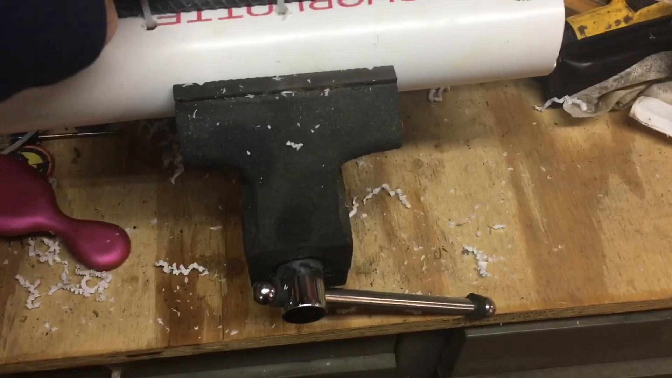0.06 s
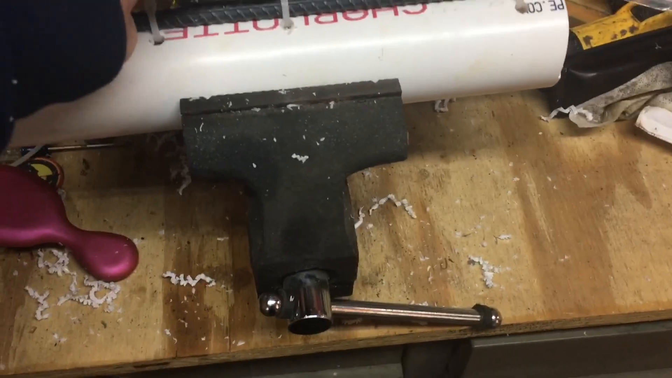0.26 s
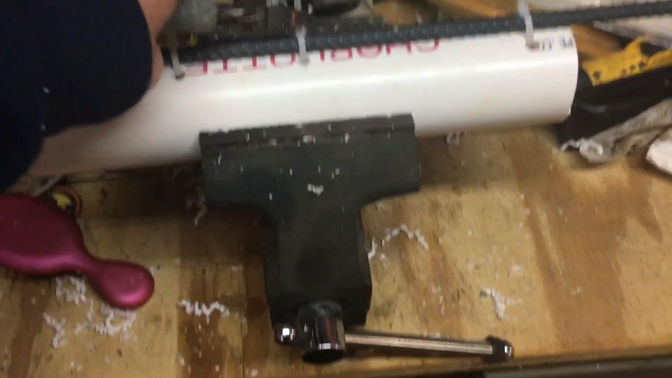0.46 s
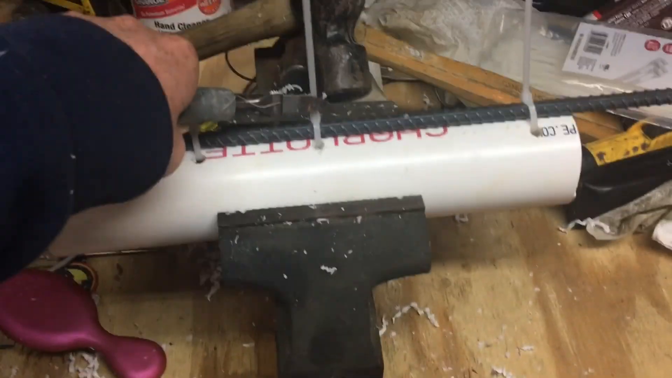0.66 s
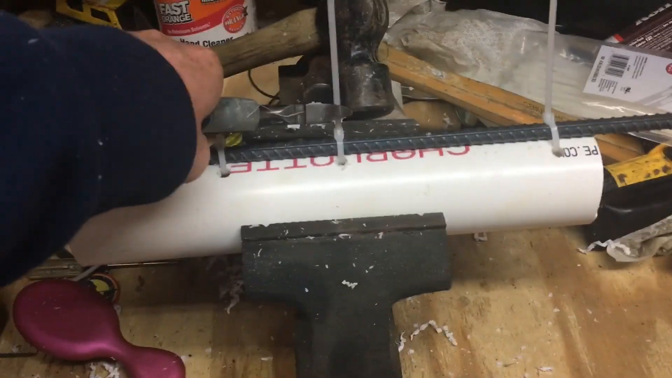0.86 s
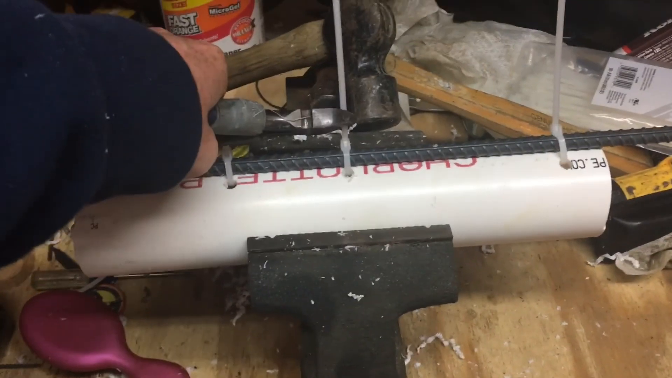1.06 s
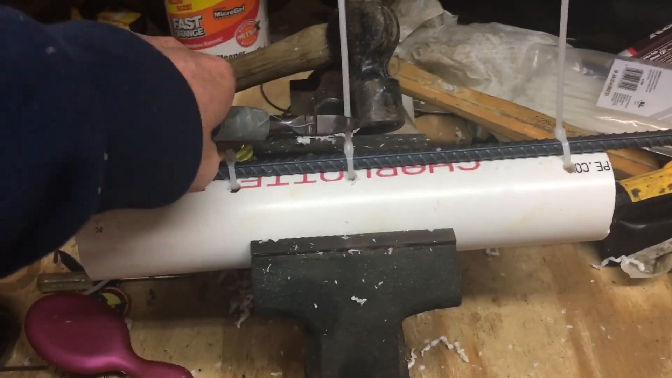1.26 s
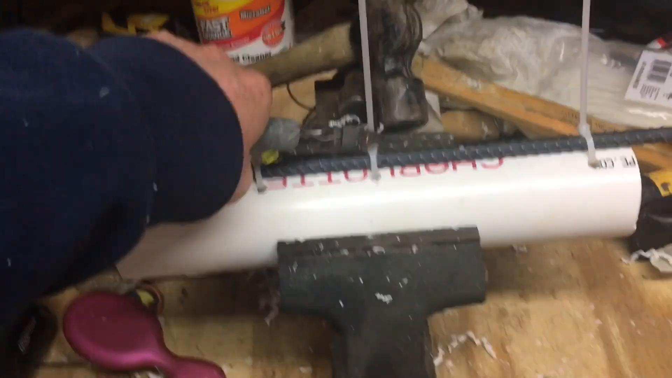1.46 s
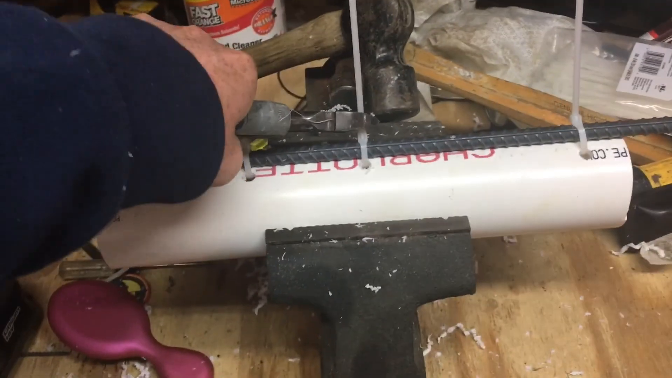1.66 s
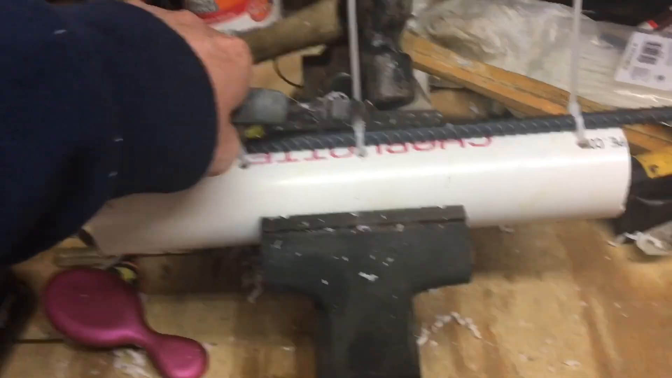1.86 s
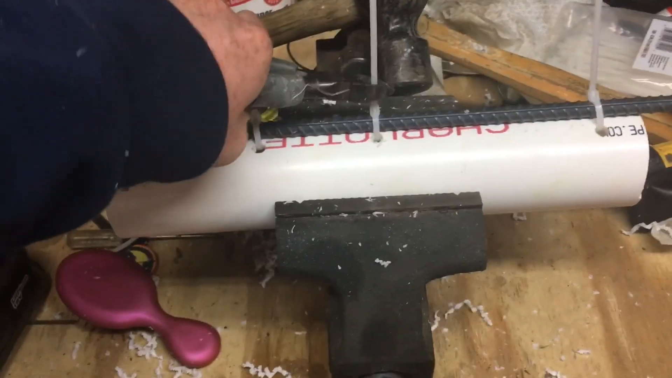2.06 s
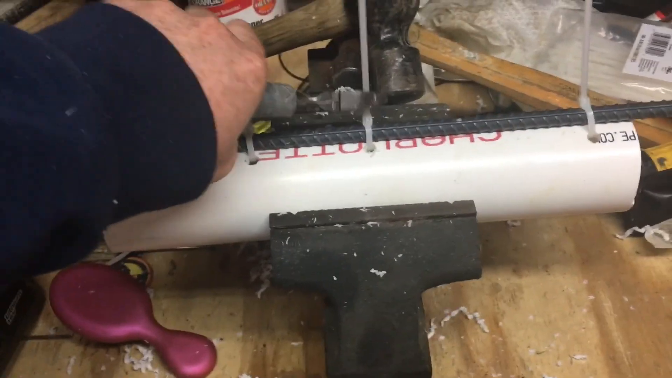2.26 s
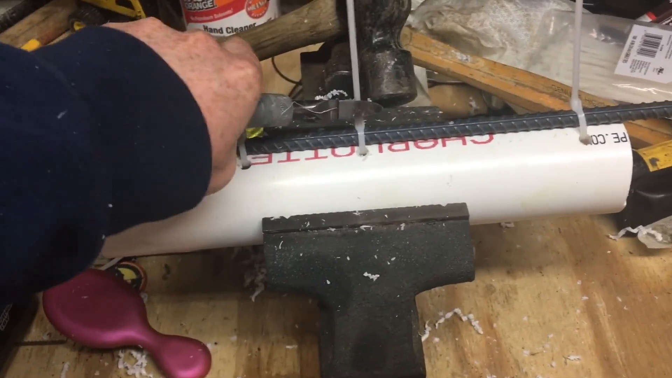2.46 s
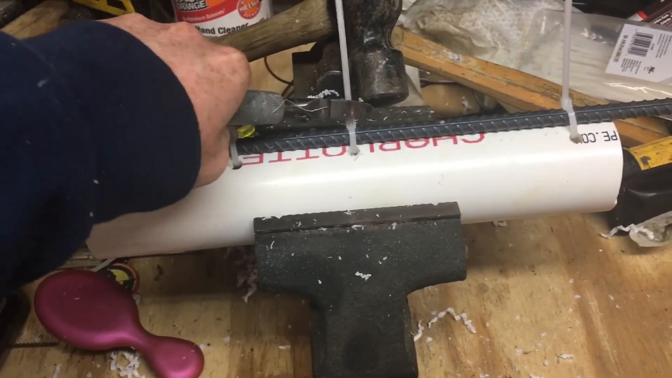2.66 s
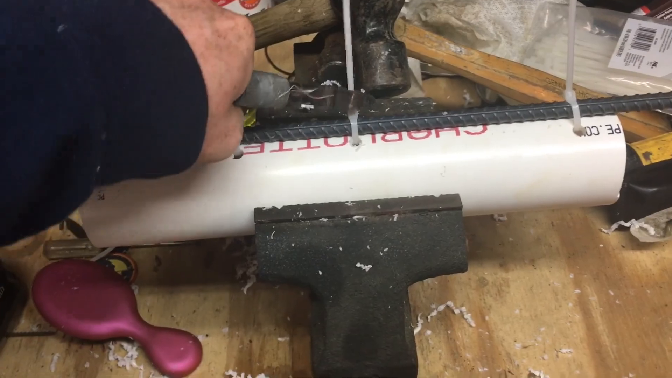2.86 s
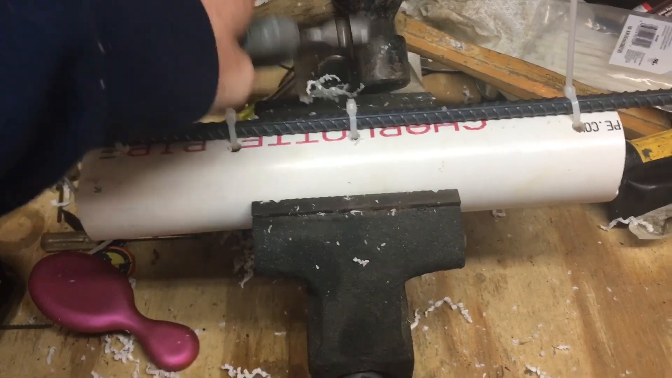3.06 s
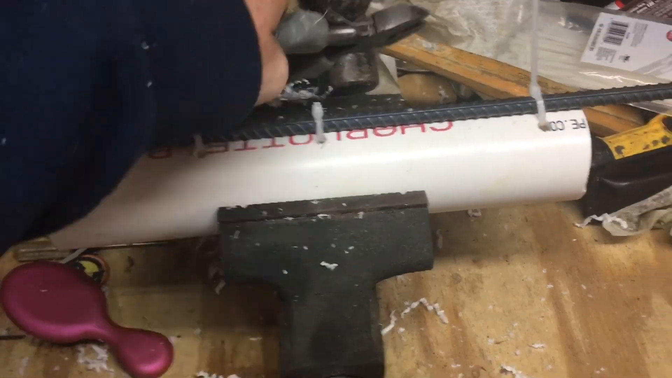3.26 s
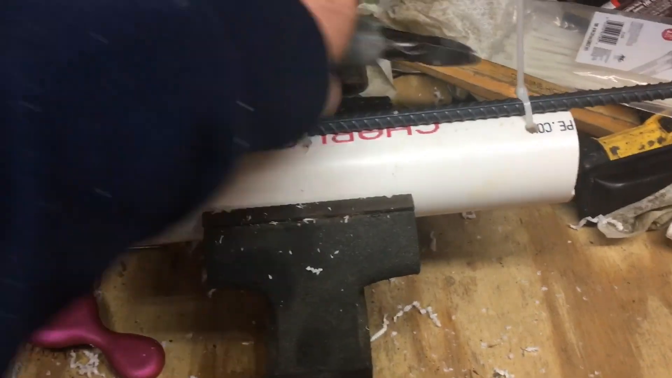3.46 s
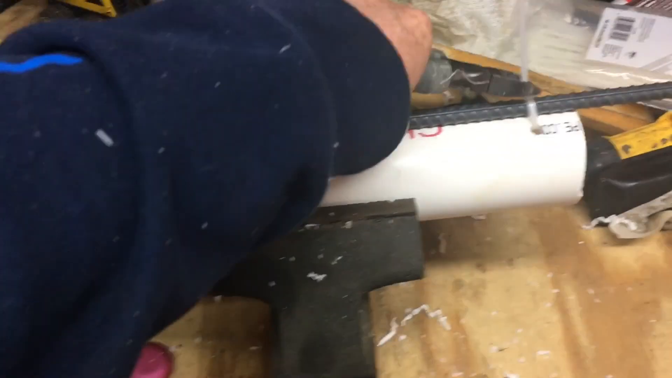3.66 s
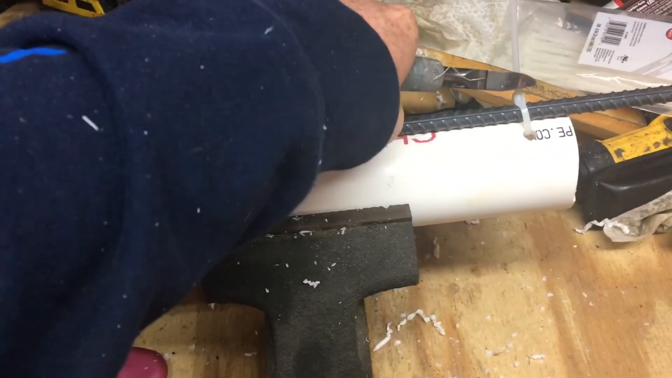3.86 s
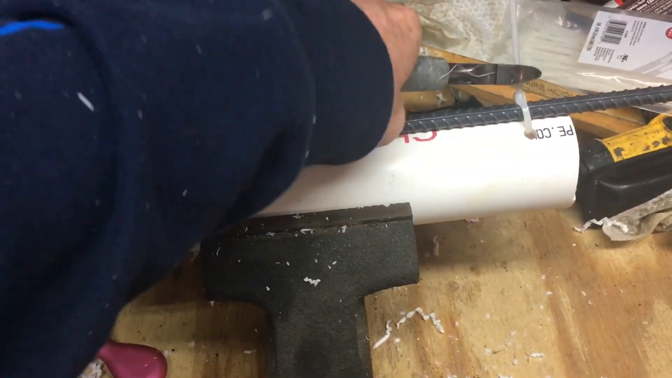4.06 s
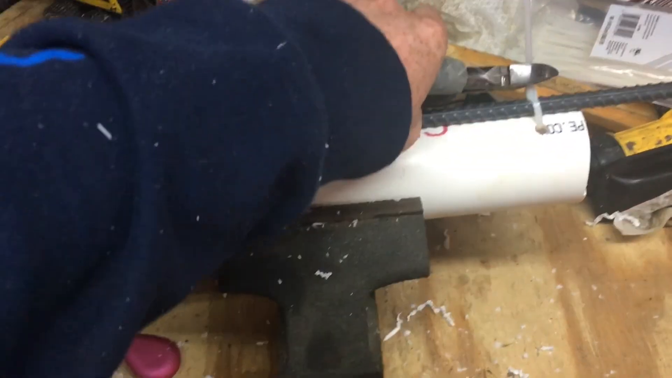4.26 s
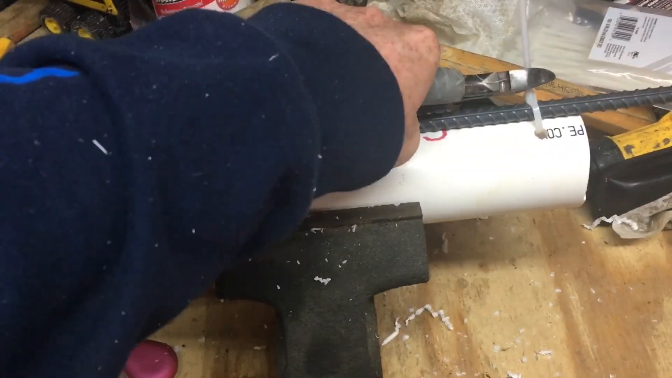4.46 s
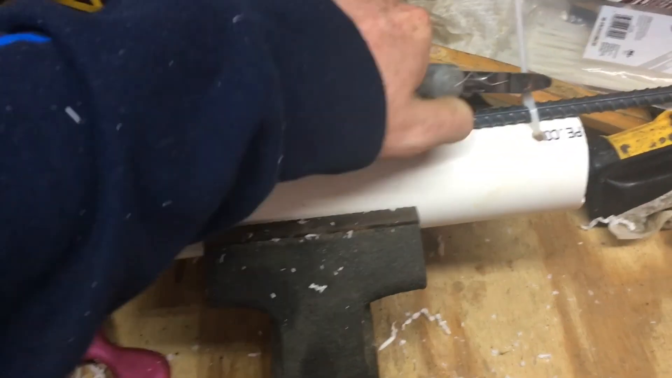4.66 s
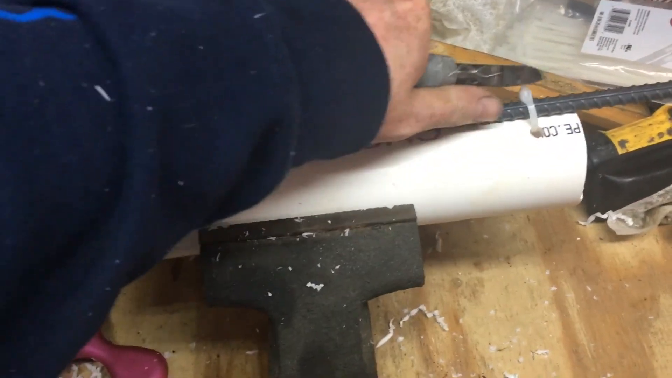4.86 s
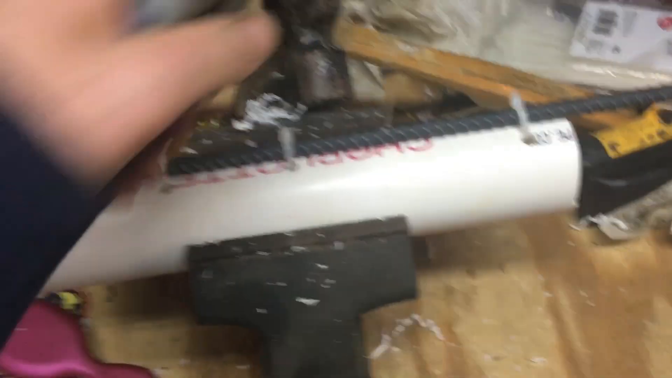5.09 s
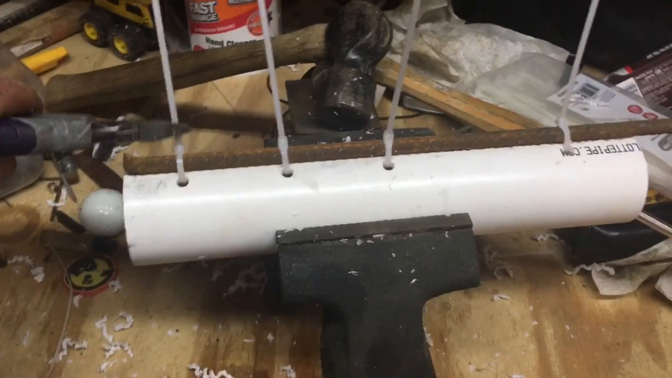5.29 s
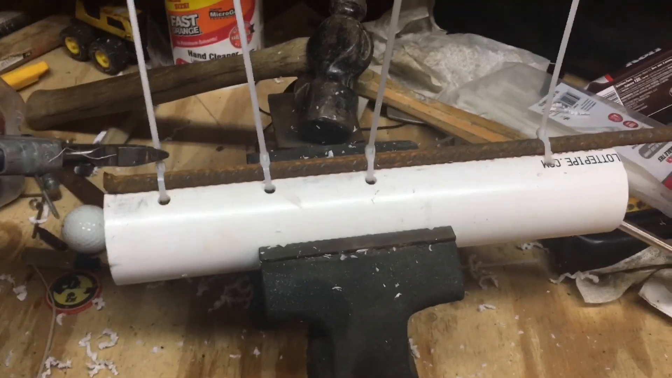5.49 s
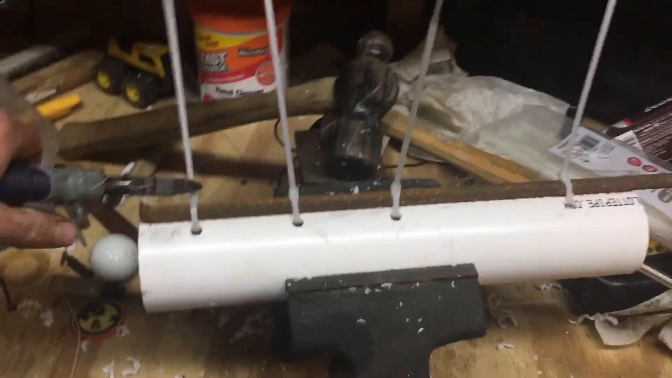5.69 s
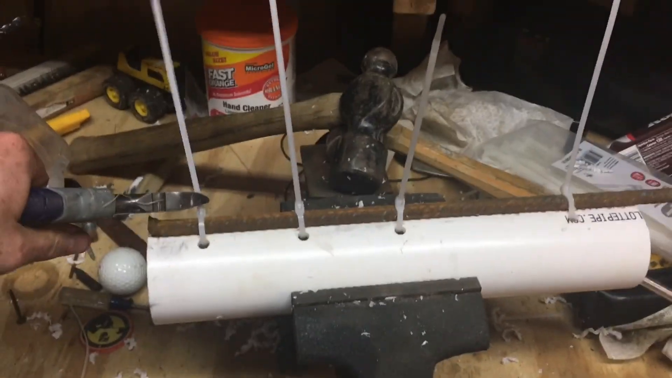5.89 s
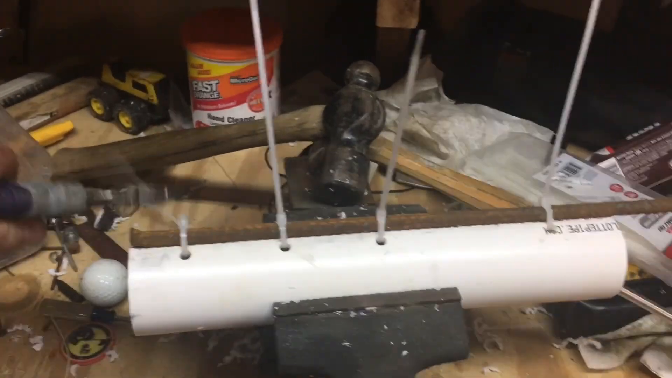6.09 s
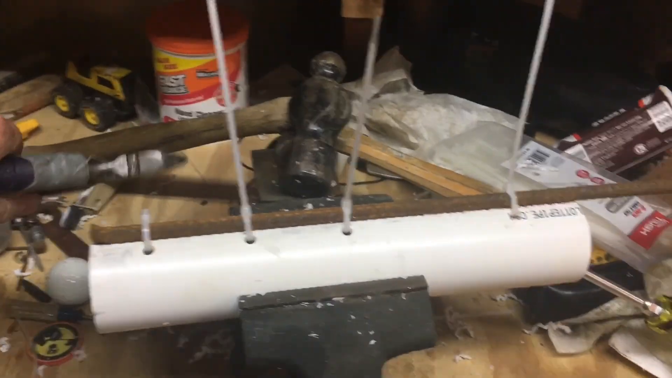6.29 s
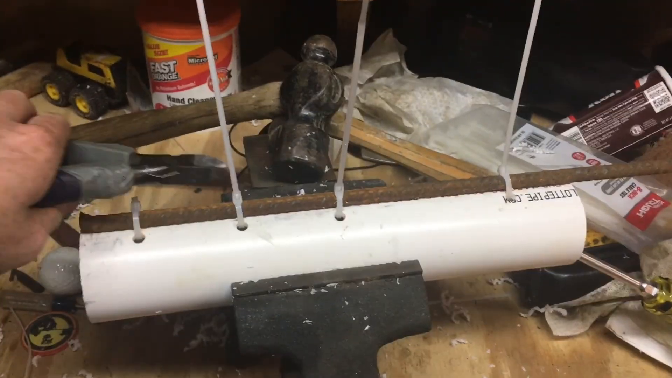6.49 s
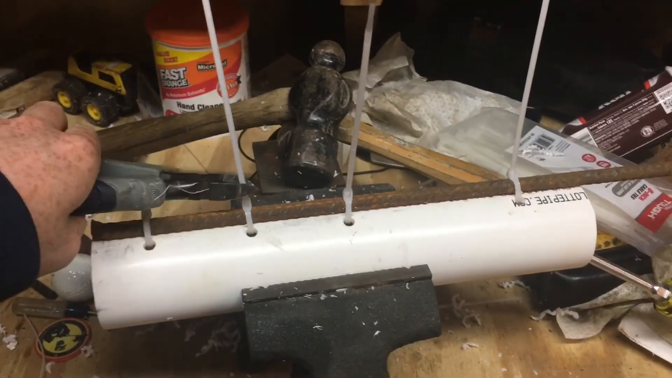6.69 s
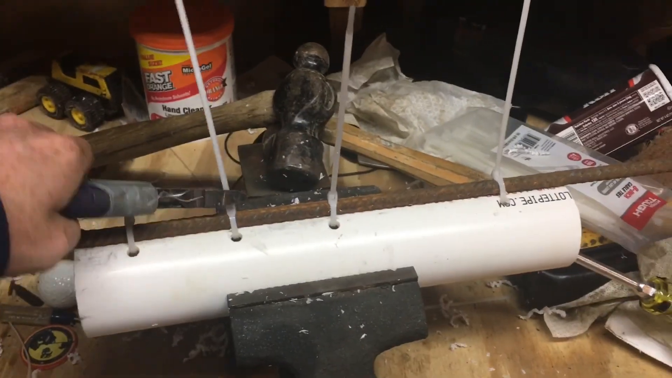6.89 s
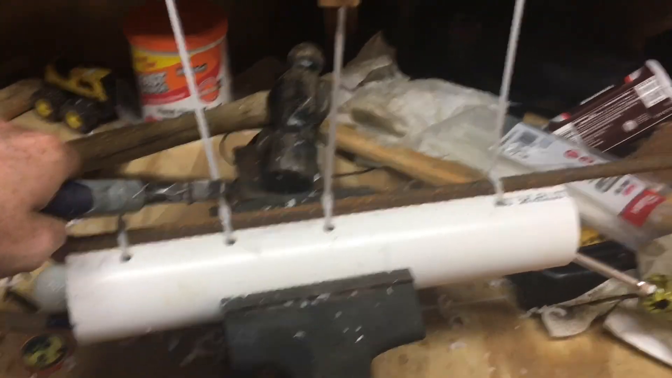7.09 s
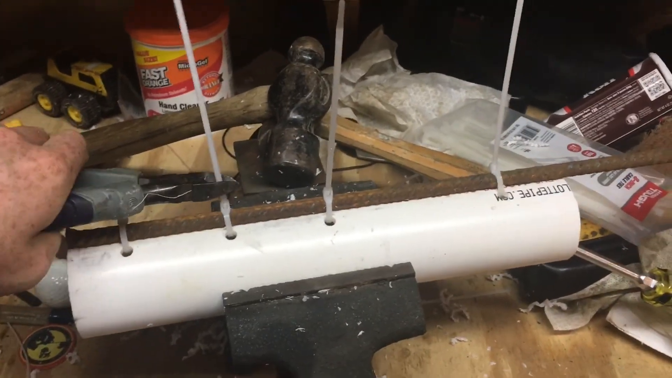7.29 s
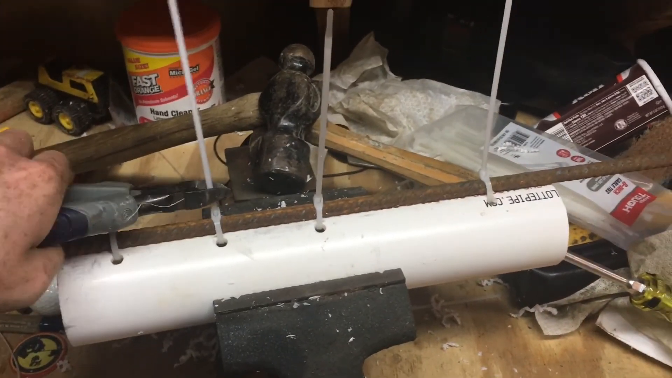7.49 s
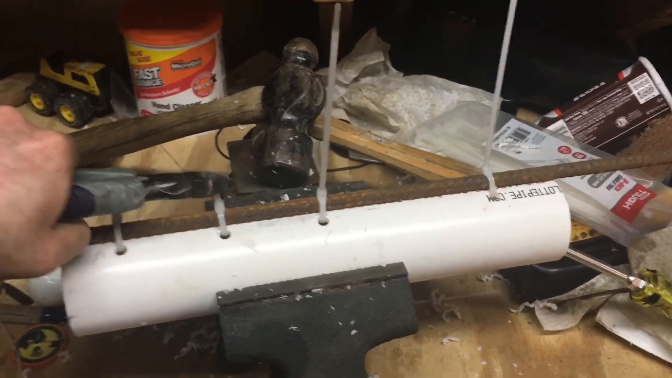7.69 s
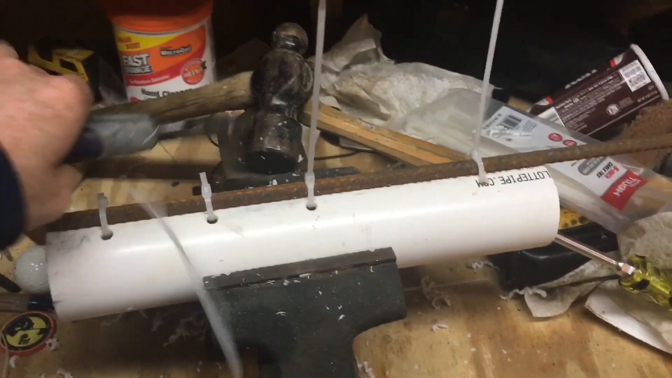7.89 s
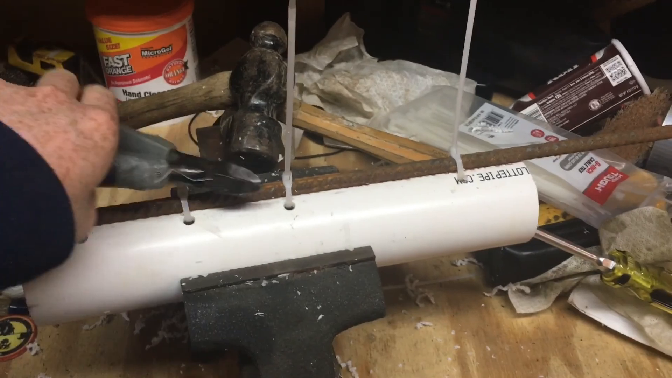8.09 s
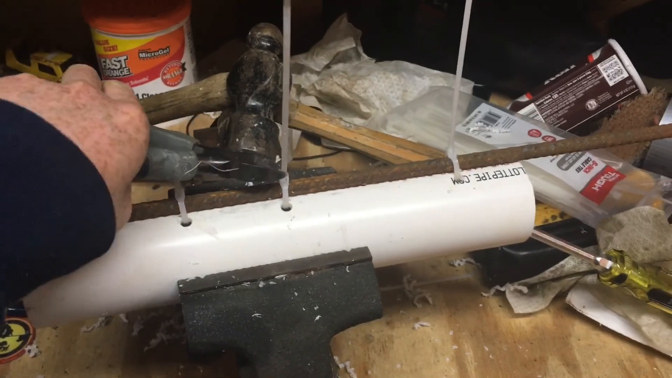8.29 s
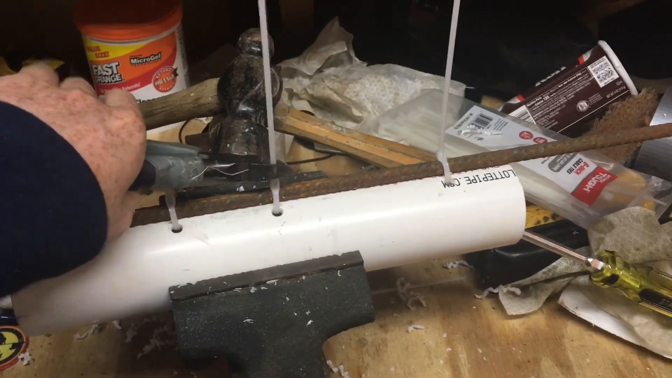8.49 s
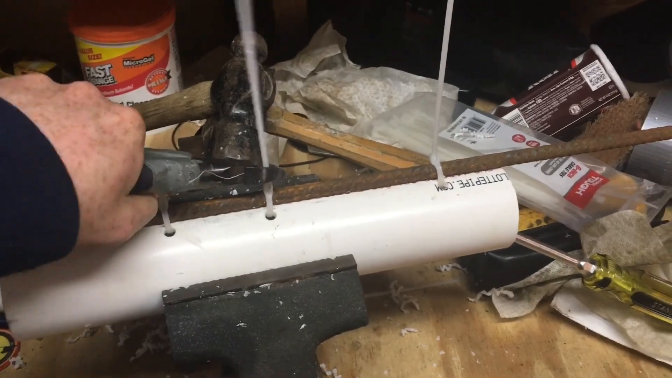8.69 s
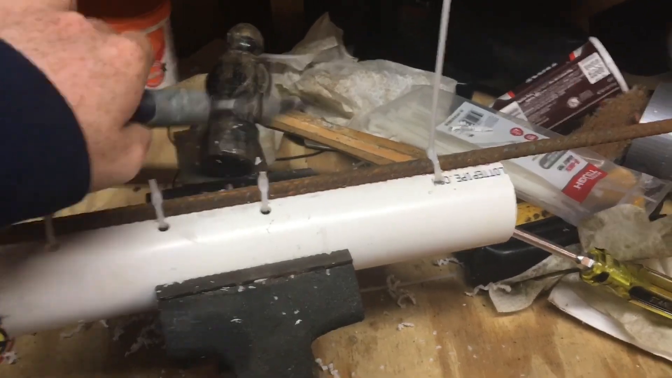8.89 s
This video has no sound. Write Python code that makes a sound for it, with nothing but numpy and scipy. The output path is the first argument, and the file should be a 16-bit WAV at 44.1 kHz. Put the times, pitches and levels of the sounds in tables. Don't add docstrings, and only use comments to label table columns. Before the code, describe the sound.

Sparse, bright plier snips crack over a steady low workshop hum, with steel ticks, dull bench knocks and cut plastic tails skittering between them.

```python
import sys
import numpy as np
from scipy import signal
from scipy.fft import rfft, irfft, next_fast_len
from scipy.io import wavfile
from scipy.ndimage import uniform_filter1d

SR = 44100
rng = np.random.default_rng(int(sys.argv[2]) if len(sys.argv) > 2 else 0)


def transcribe(u):
    v = np.clip(np.atleast_2d(u).T, -1, 1)
    q = np.round(v * 32767).astype(np.int16)
    wavfile.write(sys.argv[1], SR, q)


def makeup_ratio(level_db):
    decades = np.asarray(level_db, float) / 20
    return 10 ** decades


N = 394254
SPAN = 16384
BAR_HZ = 2460

# start_s, level_db, pitch_hz, width_ms, gain_drop_db
BENCH_THUMPS = [
    (2.238, -39.5, 105, 4.2, -2),
    (2.922, -33.5, 60.7, 2.3, 10.5),
    (4.814, -33, 65.6, 3.1, 7.5),
    (7.365, -42, 69.7, 6.3, -1.5),
    (7.657, -21, 67.7, 2.6, 5.5),
    (8.749, -25.5, 65.4, 1.73, 8),
]


def evened(x):
    return x / np.sqrt(np.mean(x ** 2) + 1e-30)


def read(points, hz):
    f, value = np.transpose(points)
    return np.interp(np.log(hz + 1), np.log(f + 1), value)


def add(mix, start_s, sound):
    first = round(start_s * SR) - len(sound) // 2
    part = mix[max(first, 0):first + len(sound)]
    part += sound[max(-first, 0):][:len(part)]


def wander(count, smooth):
    size = max(int(smooth), 1)
    noise = rng.standard_normal(count)
    return evened(uniform_filter1d(uniform_filter1d(noise, size), size))


def peak(hz, centre_hz, width_hz):
    return 1 / np.sqrt(1 + (2 * (hz - centre_hz) / width_hz) ** 2)


def band(hz, lo_hz, hi_hz):
    high_pass = 1 + (lo_hz / (hz + 1)) ** 6
    low_pass = 1 + (hz / hi_hz) ** 6
    return evened(1 / np.sqrt(high_pass * low_pass))


def smeared(layers, width_ms, t60_s, skirt_db=-12, slope_ms=33.0, reach_ms=72.7, tail_db=-11, modes_db=-0.5,
            stripes_db=5.5):
    t = (np.arange(SPAN) - SPAN // 2) / SR
    t_ms = 1000 * t
    core = np.exp(-.5 * (t_ms / width_ms) ** 2)
    edge = np.cos(np.pi / 2 * np.clip(t_ms / reach_ms, -1, 1)) ** 1.9
    skirt = makeup_ratio(skirt_db) * np.exp(-abs(t_ms) / slope_ms) * edge
    end = np.clip(1.6 - t / 0.054, .15, 1) * np.clip((t[-1] - t) / .05, 0, 1)
    tail = (t > 0) * makeup_ratio(tail_db) * np.exp(-np.log(1000) * abs(t) / t60_s) * end

    modes = makeup_ratio(modes_db * wander(layers.shape[1], 26))
    scrambled = layers * modes * np.exp(2j * np.pi * rng.random(len(modes)))
    noise = irfft(scrambled)
    heard = np.sqrt(np.average(noise ** 2, axis=1, weights=core ** 2 + skirt ** 2))
    wanted = np.sqrt(np.mean(layers ** 2, axis=1))
    gains = wanted / heard
    crackle = makeup_ratio(.6 * wander(SPAN, 70))
    stripes = evened(makeup_ratio(stripes_db * np.tanh(wander(len(modes), 18))))
    lines = irfft(gains @ scrambled * stripes)

    power = core ** 2 + skirt ** 2 + tail ** 2
    sharp = np.where(t < 0, core ** 2 / (power + 1e-30), 1)
    return (sharp * (gains @ noise) + (1 - sharp) * lines) * crackle * np.sqrt(power)


def contact(hz, treble_db, middle_db, low_db):
    # pitch_hz, level_db
    steel_spectrum = [(3500, -14), (5000, -13.5), (6000, -1), (8000, -7), (9700, -1), (11000, -2),
                      (13000, -2), (15700, 1)]
    light = np.clip((-51.5 - middle_db) / 13.0, 0, 1)
    steel = evened(makeup_ratio(read(steel_spectrum, hz)) * band(hz, 3200, 15700))
    handle = evened(band(hz, 1700, 4000) * (1 + 1.5 * light * peak(hz, 2460, 380) ** 2))
    hollow = evened(band(hz, 300, 1000) * (1 + 1.0 * light * peak(hz, 887, 200) ** 2))
    return makeup_ratio([[treble_db], [middle_db], [low_db]]) * [steel, handle, hollow]


def hum():
    # start_s, pitch_hz, level_db
    motor_points = [(0, 195.8, -45.5), (1.4, 198.4, -43), (2.3, 196.2, -48), (3.7, 196.8, -43.5),
                    (5.17, 195, -45), (5.19, 196.9, -44.5), (8.1, 197.3, -44.5), (8.94, 197.4, -41.5)]
    # pitch_hz, level_db
    mate_tones = [(59.5, -70), (239, -64), (281, -73), (319, -69.5), (396, -75.5), (535, -79), (850, -84.5),
                  (3320, -92.5)]
    # start_s, length_s, pitch_hz, level_db
    load_events = [
        (3.103, 1.6, 100, -58.5),
        (5.192, 0.32, 86.84, -55),
        (7.875, 0.75, 87.9, -58),
    ]
    idle_hz, idle_db, load_ramp_s = 100, -64.5, .09
    t = np.arange(N) / SR
    point_s, point_hz, point_db = np.transpose(motor_points)
    motor = np.interp(t, point_s, point_hz), np.interp(t, point_s, point_db)

    load = [np.clip(np.minimum(t - start_s, start_s + length_s - t) / load_ramp_s, 0, 1)
            for start_s, length_s, _, _ in load_events]
    _, _, load_hz, load_db = np.transpose(load_events)
    drone = idle_hz + (load_hz - idle_hz) @ np.sign(load), idle_db + (load_db - idle_db) @ load

    out = np.zeros(N)
    tones = [motor, drone] + mate_tones
    wavers_db = [1.5, 2.5] + [4.0] * len(mate_tones)
    for (hz, db), waver_db in zip(tones, wavers_db):
        turns = np.cumsum(hz + 1.5 * wander(N, 2600)) / SR
        level = np.sqrt(2) * makeup_ratio(db + waver_db * wander(N, 3100))
        out += level * np.sin(2 * np.pi * turns)
    return out


def air():
    # pitch_hz, level_db (per Hz)
    room_spectrum = [(20, -21), (60, -20.5), (125, -18), (200, -10.5), (330, -20), (450, -30.5),
                     (650, -36.5), (1200, -40), (2400, -50), (5000, -54.5), (6200, -52), (10400, -53),
                     (12500, -48), (15600, -53.5)]
    air_db = -67
    frames, hz = N // 512 + 5, np.fft.rfftfreq(2048, 1 / SR)
    a, b, patches = rng.standard_normal((frames, 1025, 3)).T
    patches = evened(uniform_filter1d(uniform_filter1d(patches, 14, 0), 8, 1))
    shape = makeup_ratio(read(room_spectrum, hz))
    drift_db = 1.1 * patches + .45 * wander(frames, 3)
    z = (a + 1j * b) * shape[:, None] * makeup_ratio(drift_db)
    share = np.linalg.norm(shape) / np.linalg.norm(shape[hz > 400])
    noise = signal.istft(z, nperseg=2048, noverlap=1536)[1][:N]
    return makeup_ratio(air_db) * share * evened(noise)


def rings():
    # start_s, pitch_hz, level_db, t60_s
    struck_modes = [(1.43, 850, -57, 0.11), (.9, 2360, -82, .6), (1.619, 57, -65, 1.6),
                    (1.96, 9650, -61.5, .088), (2.307, 9740, -51, 0.045), (2.308, 12850, -60, 0.083),
                    (3.283, 6280, -41.5, 0.068), (3.305, 1027, -43.5, 0.18), (3.31, 2020, -36, .11),
                    (3.43, 10800, -65.5, .35), (3.68, 607, -58.5, 0.3), (3.69, 438, -53.5, 0.28),
                    (4.89, 744, -54, 0.41), (5.975, 1544, -54, 0.082), (3.685, 1510, -60, 0.068),
                    (4.92, 143.8, -46.5, 0.61), (6.122, 9630, -46, 0.11), (6.775, 12560, -61.5, 0.095),
                    (7.7, 2150, -54, 0.2), (8.77, 2150, -55, .2), (8.875, 5290, -63, 1.3),
                    (8.88, 12700, -65, 0.23)]
    # start_s, level_db, t60_s
    bar_notes = [
        (.05, -80, .1),
        (1.09, -80, .5),
        (1.19, -77, 0.34),
        (2.4, -71, 0.26),
        (2.56, -76.5, 0.99),
        (4.519, -62, 0.13),
        (6.777, -62, .08),
        (7.71, -51.5, 0.21),
        (8.775, -42, 0.19),
    ]
    flutter_db = 3.5
    out, t = np.zeros(N), (np.arange(2 * SPAN) - SPAN) / SR
    start, end = .5 + .5 * np.tanh(t / 0.0068), np.clip((t[-1] - t) / .08, 0, 1)
    bar_modes = [(start_s, BAR_HZ, db, t60_s) for start_s, db, t60_s in bar_notes]
    for start_s, hz, db, t60_s in struck_modes + bar_modes:
        level = makeup_ratio(db + 0.51 * flutter_db * wander(len(t), 320))
        decay = np.exp(-np.log(1000) * t.clip(0) / t60_s)
        blur = .22 * flutter_db * wander(len(t), 300)
        add(out, start_s, 2.0 * level * decay * start * end * np.sin(2 * np.pi * hz * t + blur))
    return out


def rubs():
    # start_s, level_db
    rub_grains = [(.052, -68), (.245, -72), (.27, -73), (.83, -72), (.875, -71), (1.44, -57), (1.505, -71),
                  (1.9, -71), (1.97, -76), (2.24, -65), (2.315, -63), (2.419, -68), (2.69, -78),
                  (2.735, -74), (4.48, -68), (4.52, -58)]
    hz = np.fft.rfftfreq(SPAN, 1 / SR)
    resonance = evened(peak(hz, 2420, 330) ** 2)[None]
    out = np.zeros(N)
    for start_s, db in rub_grains:
        add(out, start_s, smeared(makeup_ratio(db) * resonance, 8.3, .08, modes_db=3.0))
    return out


def ticks():
    # start_s, steel_db, body_db (handle and pipe over steel), ring_hz
    jaw_clicks = [
        (1.436, -54, -6, 9700),
        (2.315, -55, -11.5, 865),
        (2.43, -58, -14, 9800),
        (2.691, -64.5, -13, 9550),
        (3.985, -60, -7.5, 5430),
        (4.942, -52.5, -2.5, 6620),
        (8.162, -49, -22.5, 5560),
        (8.534, -63, -5.5, 12200),
    ]
    # start_s, treble_db, body_db (middle over treble), ring_hz
    tail_bounces = [
        (3.075, -42.5, -0.5, 8970),
        (3.114, -48.5, -2, 1400),
        (3.456, -49.5, -6, 11100),
        (4.483, -58, -12, 2210),
        (5.055, -49.5, -7, 12180),
        (6.031, -53, -8.5, 5170),
        (8.886, -51, -14.5, 5400),
    ]
    # start_s, pipe_db, handle_db (over pipe), steel_db (over pipe)
    pipe_knocks = [(2.237, -63, -2.5, 4.5), (3.312, -43, 8.5, -16.5), (3.687, -53, -19, -24.5),
                   (4.262, -61, -11, -19.5), (4.525, -60, -2.5, -8.5), (4.618, -62, -0.5, 6),
                   (4.897, -41, -15, -12.5), (4.925, -50.5, -10, -11.5), (6.548, -72, -2.5, -7),
                   (5.98, -48.5, -7.5, -5.5), (6.071, -52, -4, -6.5), (6.127, -52.5, -6, 10.5),
                   (6.781, -51.5, -18, -24), (7.366, -58.5, -15, -4)]
    # start_s, level_db
    steel_touches = [(0.829, -69), (1.202, -71.5), (1.965, -60.5), (4.674, -66), (5.128, -61),
                     (5.158, -62.5), (5.3, -72), (5.385, -68.5), (5.514, -60), (5.69, -68.5), (6.33, -63.5),
                     (6.433, -67), (6.688, -71), (6.884, -63.5), (7.824, -49.5), (7.969, -51), (8.012, -65),
                     (8.315, -70.5)]
    jaw_ring_db, bounce_ring_db = 23, 18
    jaw_pipe_db, bounce_pipe_db = 0, -8.5
    touch_body_db = -18.5

    # start_s, three layer levels in dB, ring_hz, ring_db, width_ms
    clicks = [(s, db, db + body, db + body + jaw_pipe_db, f, jaw_ring_db, 6.3) for s, db, body, f in jaw_clicks]
    clicks += [(s, db, db + body, db + body + bounce_pipe_db, f, bounce_ring_db, 6.1)
               for s, db, body, f in tail_bounces]
    clicks += [(s, db + steel, db + body, db, BAR_HZ, -30, 7.5) for s, db, body, steel in pipe_knocks]
    clicks += [(s, db, db + touch_body_db, db + touch_body_db, 12500, 3, 8.0) for s, db in steel_touches]

    out, hz = np.zeros(N), np.fft.rfftfreq(SPAN, 1 / SR)
    for start_s, *levels_db, ring_hz, ring_db, width_ms in clicks:
        ringing = makeup_ratio(ring_db - 8.0) * peak(hz, ring_hz, 120 + 0.035 * ring_hz) ** 2
        layers = contact(hz, *levels_db) * (1 + ringing)
        add(out, start_s, smeared(layers, width_ms, 0.24, skirt_db=-7.5, slope_ms=34.0, tail_db=-11, modes_db=2.5))
    return out


def thumps():
    wood_db = -18
    out, t, bins_hz = np.zeros(N), (np.arange(SPAN) - SPAN // 2) / SR, np.fft.rfftfreq(SPAN, 1 / SR)
    for start_s, db, hz, width_ms, _ in BENCH_THUMPS:
        shape = np.exp(-np.hypot(1000 * t, .8) / width_ms)
        add(out, start_s, 2.3 * makeup_ratio(db) * np.cos(2 * np.pi * hz * t + .6) * shape)
        wood = makeup_ratio(db + wood_db) * band(bins_hz, 120, 380)[None]
        add(out, start_s, smeared(wood, 11.0, .1, modes_db=-1.5))
    return out


def snips():
    # start_s, treble_db, air_db, bright_db (per octave), width_ms
    cut_events = [
        (2.919, -20.5, -35.5, 1.2, 5.7),
        (4.815, -19.5, -38.5, 1, 7),
        (5.937, -25.5, -57.5, 4.5, 8),
        (5.951, -31, -54.5, 3, 4.5),
        (7.659, -21, -40.5, 2.3, 9),
        (8.749, -22.5, -38.5, 3.5, 11),
    ]
    # pitch_hz, level_db (per Hz)
    snap_spectrum = [(1760, -51), (3000, -34), (4300, -7.5), (4930, -10), (5860, -1), (6640, -7.5),
                     (9500, -1), (10300, -4.5), (12300, 1), (15600, -10.5)]
    # pitch_hz, width_hz, level_db
    wall_modes = [(1380, 65, -0.5), (2150, 55, 2), (2680, 430, -9), (3460, 440, -4.5)]
    # pitch_hz, width_hz
    column_mode = (1600, 230)
    wall_db, wall_per_bright = -15, -1.1
    out, hz = np.zeros(N), np.fft.rfftfreq(SPAN, 1 / SR)
    snap = makeup_ratio(read(snap_spectrum, hz)) * band(hz, 2500, 17500)
    wall = evened(sum(makeup_ratio(db) * peak(hz, f, w) for f, w, db in wall_modes) * band(hz, 1100, 5000))
    column = evened(peak(hz, *column_mode) ** 2)[None]
    for start_s, treble_db, air_db, bright_db, width_ms in cut_events:
        pipe_db = treble_db + wall_db + wall_per_bright * bright_db
        tilted = evened(snap * makeup_ratio(bright_db * np.log2((hz + 1) / 9000)))
        bench = makeup_ratio(pipe_db - 14) * band(hz, 450, 1700)
        layers = np.array([makeup_ratio(treble_db) * tilted, makeup_ratio(pipe_db) * wall, bench])
        add(out, start_s, smeared(layers, width_ms, 0.44, stripes_db=6.0))
        add(out, start_s, smeared(makeup_ratio(air_db) * column, 9.0, 0.16, skirt_db=-14, tail_db=-0.5, modes_db=2.4,
                                  slope_ms=73.0, stripes_db=3.0))
    return out


def scuffs():
    # start_s, treble_db, body_db (middle over treble), width_ms
    scrape_events = [(3.01, -65.5, 7, 13), (3.139, -49.5, -1.5, 7), (3.422, -43.5, -6.5, 6.5),
                     (3.18, -60, -1, 20), (3.235, -68.5, -2, 16), (3.295, -48.5, -13, 13),
                     (3.325, -65, 23, 6.8), (3.385, -54.5, -10, 12), (3.493, -58.5, -5, 15),
                     (4.87, -51.5, 2, 14), (6.112, -48.5, 1, 8), (6.15, -56, -9, 16), (6.2, -66, 0, 17),
                     (7.718, -59.5, 11.5, 19), (8.785, -45.5, 8.5, 17), (8.828, -61.5, 7.5, 10.5)]
    pipe_db = -11
    out, hz = np.zeros(N), np.fft.rfftfreq(SPAN, 1 / SR)
    for start_s, db, body_db, width_ms in scrape_events:
        layers = contact(hz, db, db + body_db, db + body_db + pipe_db)
        add(out, start_s, smeared(layers, width_ms, 0.063, skirt_db=-10.5, slope_ms=50.0, modes_db=5.0))
    return out


def scene():
    return (hum() + air() + rings() + rubs() + ticks() + thumps() + snips() + scuffs())[None]


def band_limit(x):
    return signal.sosfilt(signal.butter(12, 15770, fs=SR, output="sos"), x)


def record(dry):
    change_s, change_half_s = 5.18, .02
    edge_hz = 15760
    t, drop_db = np.arange(N) / SR, np.zeros(N)
    for start_s, *_, db in BENCH_THUMPS:
        after = t - start_s - .012
        fall = np.clip(after / 0.03, 0, 1)
        recovery = np.clip(1 - (after - .06) / 0.13, 0, 1)
        drop_db += db * fall * recovery
    dip = np.clip(abs(t - change_s) / change_half_s - .2, .03, 1)
    size = next_fast_len(N)
    hz = np.fft.rfftfreq(size, 1 / SR)
    mic = (hz < edge_hz) / np.sqrt(1 + (38 / (hz + 1)) ** 4)
    heard = irfft(rfft(dry * makeup_ratio(-drop_db) * dip, size) * mic, size)[:, :N]
    return band_limit(heard)


dry = scene()
out = record(dry)
transcribe(out)
```